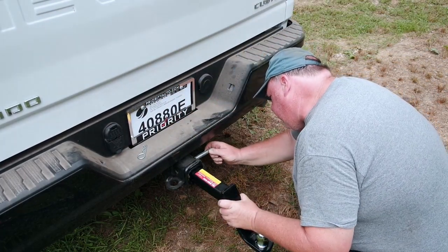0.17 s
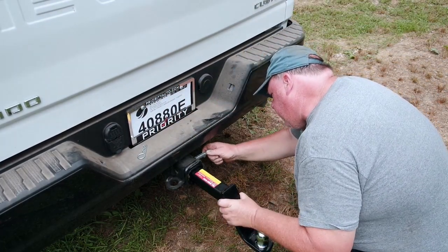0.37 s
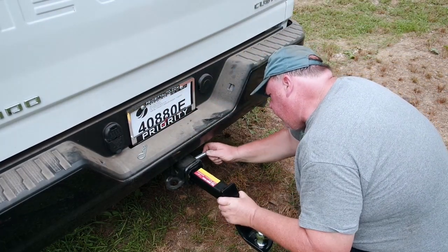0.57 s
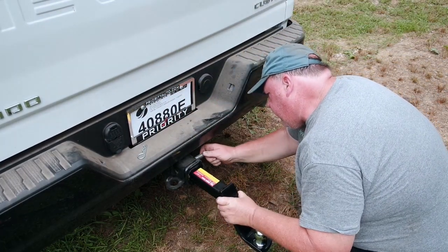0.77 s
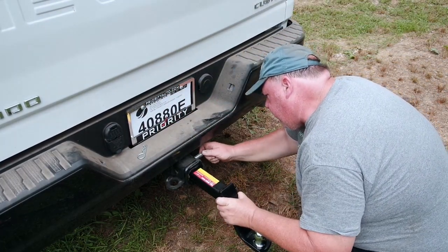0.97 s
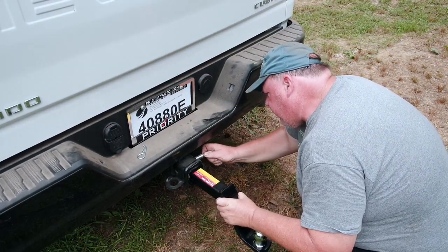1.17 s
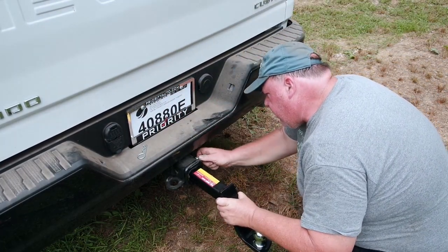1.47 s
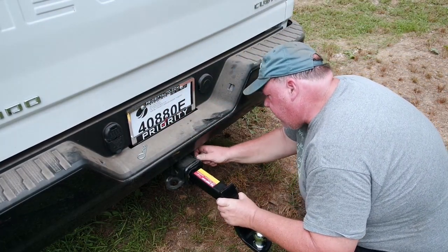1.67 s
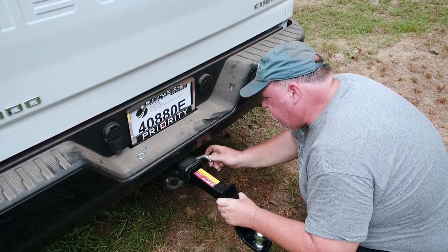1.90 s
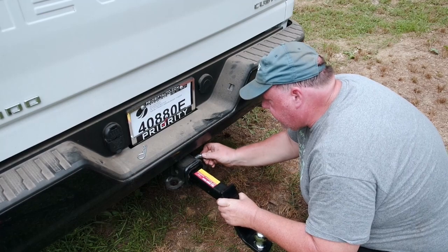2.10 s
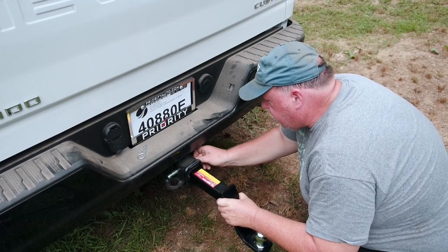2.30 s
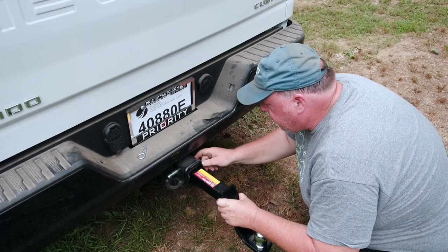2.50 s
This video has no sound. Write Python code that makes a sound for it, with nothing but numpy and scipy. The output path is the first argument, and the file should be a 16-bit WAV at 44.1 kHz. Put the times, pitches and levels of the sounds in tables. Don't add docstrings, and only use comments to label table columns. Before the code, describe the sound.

Metal clanking of a hitch close up outdoors: bright pin taps, a heavy shank knocking and scraping in its tube with hollow low thuds, then a short rattle and a loud, sharp click over quiet air.

```python
import sys
import numpy as np
from scipy import signal
from scipy.fft import rfft, irfft
from scipy.io import wavfile
from scipy.ndimage import uniform_filter1d

SR = 44100
rng = np.random.default_rng(int(sys.argv[2]) if len(sys.argv) > 2 else 0)


def ratio(d):
    e = np.asarray(d, float) / 20
    return 10 ** e


def wrap_up_sound(samples):
    columns = np.atleast_2d(samples).T
    tamed = np.clip(columns, -1, 1)
    steps = np.round(tamed * 32767).astype(np.int16)
    wavfile.write(sys.argv[1], SR, steps)


N = 116865
RING_N = 16000
CHATTER_N = 4000
OPEN_S = .099
BRIGHT_SPLIT_HZ, DULL_SPLIT_HZ = 5750, 2320
CLATTER_DB, CLEAR_DB = 5, -8
BOUNCE_S, GRIPPED_T60_S = 0.0024, 0.2

# hz, level_db, t60_s
PIN_MODES = [(2225, 1, 0.079), (2914, -10.5, 0.087), (5300, -13.5, 0.051), (6376, -5.5, 0.026),
             (7120, -2, 0.015), (8890, -10, 0.045), (10104, -4, 0.0043), (14300, -23, .045)]
# hz, level_db, t60_s
SHANK_MODES = [(1026, -28.5, .09), (1583, -27.5, 0.033), (2136, -4.5, 0.0067), (2670, -23, 0.023),
               (3116, -6.5, 0.026), (3774, -15, 0.034), (4210, -8, 0.033), (4580, -16, 0.014)]
# hz, level_db, t60_s
TUBE_MODE = (1874, -3, .075)
# hz, level_db, t60_s
BOOM_MODES = [(80, -15.5, 0.16), (112.4, -7, 0.21), (138.2, 7, 0.12), (189.3, -4.5, 0.25),
              (228.9, -15, 0.39), (266.6, -7.5, 0.098)]
# hz, level_db, t60_s
KNOCK_MODES = [(323, -8.5, 0.45), (384.6, -4, 0.24), (446.3, -2, 0.21), (504, 6.5, 0.059), (571, -3, 0.24),
               (619, -4, 0.12), (697.6, -1, 0.19), (788, -11.5, 0.11), (981.6, -4, 0.15)]


def evened(x):
    return x / np.sqrt(np.mean(x ** 2) + 1e-20)


def peaked(x):
    return x / (abs(x).max() + 1e-12)


def filtered(x, order, cut_hz, kind):
    return signal.sosfilt(signal.butter(order, cut_hz, kind, fs=SR, output="sos"), x)


def read(points, hz):
    f, value = np.transpose(points)
    return np.interp(np.log(hz + 1), np.log(f + 1), value)


def add(mix, start_s, sound):
    part = mix[round(start_s * SR):][:len(sound)]
    part += sound[:len(part)]


def yard():
    # hz, level_db_per_hz
    air_spectrum = [(15, -30), (25, -10), (160, -7.5), (368, -8.5), (469, -5.5), (1410, -11), (2360, -8.5),
                    (13900, -22), (15500, 0)]
    air_db, shut_db = -60.5, -13.5
    insect_hz, insect_width_hz, insect_db = 8500, 220, -81.5
    hz = np.fft.rfftfreq(N, 1 / SR)
    shape = ratio(read(air_spectrum, hz)) * (hz < 15600)
    air = irfft(rfft(rng.standard_normal(N)) * shape, N)
    above_2k = irfft(rfft(air) * (hz > 2000), N)
    band = 1 / (1 + ((hz - insect_hz) / insect_width_hz) ** 4)
    insect = evened(irfft(rfft(rng.standard_normal(N)) * band, N))
    shut = np.where(np.arange(N) < OPEN_S * SR, ratio(shut_db), 1)
    return shut * ratio(air_db) * air / above_2k.std() + ratio(insect_db) * insect


def ring(modes, chance, spread_db=0., size=RING_N):
    hz, db, t60_s = np.transpose(modes)[:, :, None]
    t = np.arange(size) / SR
    level_db = db + spread_db * chance[:len(modes), None] - 60 * t / np.maximum(t60_s, .01)
    return (ratio(level_db) * np.sin(2 * np.pi * hz * t)).sum(0)


def clatter(noise):
    # hz, level_db_per_hz
    spectrum = [(300, -18), (884, -10), (1910, -3.5), (4620, -13), (6000, -18.5), (15000, -28)]
    # hz, t60_s
    decay = [(300, 0.56), (1000, 0.19), (3000, 0.097), (8000, 0.079), (15000, 0.015)]
    hz, t, z = signal.stft(noise, SR, nperseg=128)
    z = z * ratio(read(spectrum, hz)[:, None] - 60 * t / read(decay, hz)[:, None])
    return signal.istft(z, SR, nperseg=128)[1][:len(noise)]


def chatter(length_s, chance):
    u = np.arange(len(chance)) / (SR * max(length_s, 1e-4))
    return chance ** 3 * (u + 0.29) * np.exp(-2 * u)


def contact(blow, modes, chatter_s, clatter_db, split_hz, grip_t60_s, spread_db):
    level_db, treble_db, ring_hz, ring_db = blow
    treble_lift_db, crack_db, crack_t60_s = 10, -5.5, 0.039
    chance = rng.standard_normal(RING_N + CHATTER_N)
    t = np.arange(RING_N) / SR
    push = chatter(chatter_s, chance[RING_N:])
    energy = np.cumsum(push ** 2) / np.sum(push ** 2)
    build = np.interp(np.arange(RING_N), np.arange(CHATTER_N), np.sqrt(energy))

    crack = np.diff(chance[:RING_N + 1]) * ratio(crack_db - 60 * t / crack_t60_s) / 4
    rough = signal.fftconvolve(peaked(clatter(chance[:RING_N])) + crack, push)[:RING_N]
    rough = peaked(rough * ratio(-60 * t / grip_t60_s))
    body = peaked(build * ring(modes + [TUBE_MODE], chance, spread_db)) + ratio(clatter_db) * rough

    treble = ratio(treble_db + treble_lift_db) * filtered(body, 3, split_hz, "high")
    body = filtered(body, 3, split_hz, "low") + treble
    ring_t60_s = 0.085 * TUBE_MODE[0] / ring_hz
    favoured = ring([(ring_hz, ring_db, ring_t60_s)], chance)
    return ratio(level_db) * peaked(peaked(body) + build * favoured)


def contacts(rows, modes, chatter_s, clatter_db, split_hz, grip_t60_s=18.0, spread_db=6):
    out = np.zeros(N)
    for start_s, *blow in rows:
        add(out, start_s, contact(blow, modes, chatter_s, clatter_db, split_hz, grip_t60_s, spread_db))
    return out


def pin_taps():
    # start_s, level_db, treble_db, ring_hz, ring_db
    taps = [(.102, -11.5, -3.5, 3430, -3), (.154, -15.5, -4.5, 1872, -3), (.4735, -21, -10, 7250, -15),
            (.6124, -14.5, -11, 2620, -4), (.7415, -19.5, -28, 1605, -13), (1.1588, -18, -8, 2470, -13.5),
            (1.979, -15, -16, 1874, -9), (2.0144, -28, -13, 5220, -17)]
    return contacts(taps, PIN_MODES, 0.0022, CLATTER_DB, BRIGHT_SPLIT_HZ)


def scrape():
    # time_s, scrape_db, rumble_db
    slide = [(0.102, -51.5, -67), (.4, -60, -49.5), (0.472, -37, -44), (.53, -48, -26.5),
             (0.721, -43, -31.5), (.85, -59, -45), (1.15, -52, -39.5), (1.35, -49.5, -31.5),
             (1.48, -40.5, -39), (1.6, -66, -40.5), (1.77, -66, -41.5), (1.8, -49, -44), (1.95, -55, -46),
             (2.1, -43.5, -38), (2.219, -48, -41.5), (2.311, -34.5, -45.5), (2.339, -81, -49),
             (2.65, -74, -57.5)]
    grit_per_s, grit_spread_db = 740, 1.5
    hiss_db, hiss_share = -63.5, 0.52
    time_s, scrape_db, rumble_db = np.transpose(slide)
    t, even = np.arange(N) / SR, np.zeros(20)
    grit = ratio(grit_spread_db * np.minimum(rng.exponential(1, N), 4))
    grit = grit * (rng.random(N) < grit_per_s / SR) * rng.choice([-1., 1.], N)

    steel = peaked(ring(SHANK_MODES + [TUBE_MODE], even))
    steel = steel + ratio(24.0) * peaked(clatter(rng.standard_normal(RING_N)))
    steel = steel + ratio(32.5) * peaked(ring(KNOCK_MODES, even))
    out = np.zeros(N)
    for body, level_db in ((steel, scrape_db), (ring(BOOM_MODES, even), rumble_db)):
        scale = np.std(signal.fftconvolve(grit, body)[:N])
        pressed = grit * ratio(np.interp(t, time_s, level_db, left=-140))
        out += signal.fftconvolve(pressed, body)[:N] / scale

    hiss = np.diff(rng.standard_normal(N + 1)) * (t > OPEN_S)
    swing_db = np.interp(t, time_s, scrape_db) - np.mean(scrape_db)
    return out + hiss * ratio(hiss_db + hiss_share * swing_db)


def thuds():
    # start_s, boom_db, knock_db
    knocks = [(0.105, -36.5, -66), (0.158, -30.5, -30), (0.208, -31, -26.5), (0.454, -25.5, -26.5),
              (0.485, -5.5, -10.5), (.574, -52, -23.5), (0.609, -15.5, -27.5), (0.699, -22.5, -27),
              (0.76, -39, -40), (0.811, -34, -55), (.94, -61, -35.5), (1.023, -13.5, -18.5),
              (1.129, -46, -38), (1.194, -14.5, -17.5), (1.301, -14.5, -20.5), (1.334, -6, -11.5),
              (1.387, -19, -26.5), (1.455, -17, -17.5), (1.491, -6.5, -11), (1.613, -28, -39.5),
              (1.824, -44, -23), (1.986, -56, -22), (2.019, -17.5, -17.5), (2.12, -41, -19.5)]
    shove_s, lag_s, rise_s, build_s = 0.0041, 0.006, 0.0031, 0.021
    detune = 0.044
    swell = 1 - np.exp(-np.arange(RING_N) / SR / rise_s)
    shove = np.r_[np.zeros(round(lag_s * SR)), np.hanning(round(shove_s * SR))]
    crowded = KNOCK_MODES * 3
    out = np.zeros(N)
    for start_s, boom_db, knock_db in knocks:
        chance = rng.standard_normal(CHATTER_N)
        boom = (BOOM_MODES, boom_db, shove, swell)
        knock = (crowded, knock_db, chatter(build_s, chance), 1)
        for modes, level_db, push, rise in (boom, knock):
            moved = [(hz * (1 + detune * c), db, t60_s) for (hz, db, t60_s), c in zip(modes, chance[::-1])]
            sound = signal.fftconvolve(rise * ring(moved, chance, 2.0), push)
            add(out, start_s, ratio(level_db) * peaked(sound))
    return out


def rim_taps():
    # start_s, level_db, treble_db, ring_hz, ring_db
    taps = [(.2016, -8.5, -12.5, 5360, -3), (.4044, -31.5, -11, 2170, -16.5), (.439, -27.5, -22.5, 2100, 7),
            (.46, -19.5, -41, 2156, 1), (.5889, -24.5, -2, 1916, 8), (.6791, -32.5, -25, 3400, -18)]
    # hz, level_db, t60_s
    rim_modes = [(1220, -34, 0.05), (1687, -13, 0.096), (2330, 0.5, 0.071), (2630, -17, 0.12),
                 (2900, -15, 0.13), (3530, -35, 0.13), (5704, -20, 0.2), (6600, -28.5, 0.16)]
    return contacts(taps, rim_modes, 0.0022, CLATTER_DB, BRIGHT_SPLIT_HZ)


def pin_skids():
    # start_s, level_db, treble_db, ring_hz, ring_db
    skids = [
        (.475, -10.5, 22, 7250, -5.5),
        (2.102, -35, -26, 2520, -5.5),
        (2.109, -18.5, -19, 3005, 4),
        (2.3145, -15.5, -6, 2814, -2.5),
    ]
    return contacts(skids, PIN_MODES, 0.009, CLATTER_DB, BRIGHT_SPLIT_HZ)


def shank_grinds():
    # start_s, level_db, treble_db, ring_hz, ring_db
    grinds = [
        (.478, -10.5, -41, 1523, -2),
        (1.331, -22.5, -6.5, 1900, 4),
        (1.457, -23, -17, 3970, -14),
        (1.487, -14, -25, 1970, -11),
    ]
    return contacts(grinds, SHANK_MODES, 0.014, CLATTER_DB, DULL_SPLIT_HZ)


def shank_hits():
    # start_s, level_db, treble_db, ring_hz, ring_db
    hits = [(.5635, -10.5, -35, 1873, 3), (.6992, -29, -29, 1880, 2), (.9277, -23.5, -17, 1934, 0),
            (1.019, -20, -16, 4210, 2), (1.1194, -46.5, -12, 1880, 16), (1.1915, -22.5, -13.5, 4210, 0),
            (1.298, -16.5, -11.5, 1873, 2), (1.820, -23, -37, 2407, -7.5), (2.074, -31, -29, 1900, -17),
            (2.2368, -23.5, -21, 3850, -15.5)]
    return contacts(hits, SHANK_MODES, 0.0054, CLATTER_DB, DULL_SPLIT_HZ)


def shank_bounces():
    # start_s, level_db, treble_db, ring_hz, ring_db
    bounces = [(1.0255, -21.5, -26, 4210, 6.5), (1.2948, -23, -19.5, 4226, 1),
               (1.4925, -5.5, -35, 1575, -12), (1.497, -6, -22, 3190, -10), (1.834, -33, -28, 2380, 5),
               (2.249, -32.5, -23, 1894, 3), (2.286, -27, -25, 3120, -7), (.629, -24.5, -14, 2620, 9)]
    return contacts(bounces, SHANK_MODES, BOUNCE_S, -1, DULL_SPLIT_HZ, GRIPPED_T60_S)


def frame_thumps():
    # start_s, level_db, treble_db, ring_hz, ring_db
    thumps = [
        (1.194, -18, -23, 1874, -19),
        (1.3365, -15.5, -21, 1927, -19),
        (1.344, -15.5, -19, 1867, -21),
        (1.827, -32.5, -22, 1910, -15),
    ]
    # hz, level_db, t60_s
    thump_modes = [(325, -7, 0.051), (484, 6.5, 0.068), (553, 0, 0.056), (713, -3.5, 0.049)]
    return contacts(thumps, thump_modes, BOUNCE_S, CLEAR_DB, DULL_SPLIT_HZ, GRIPPED_T60_S, 0.83)


def pin_rattles():
    # start_s, level_db, treble_db, ring_hz, ring_db
    rattles = [
        (2.1175, -13.5, -16, 5330, -2.5),
        (2.138, -34, -10, 2360, -4),
    ]
    # hz, level_db, t60_s
    loose_modes = [(1012, -8, .15), (1534, -2, .06), (2148, -5, .08), (2315, -8, .08), (2541, -8, .08),
                   (3031, -6, .08), (3677, -6, .08), (4204, -9, .08), (5335, -9, .06), (7730, -17, .11),
                   (8344, -25, .2), (8990, -15, .09), (11300, -16, .11)]
    return contacts(rattles, loose_modes, .012, CLEAR_DB, BRIGHT_SPLIT_HZ, spread_db=2.5)


def seat_click():
    # start_s, level_db, treble_db, ring_hz, ring_db
    clicks = [
        (2.3162, 0., -11.5, 6506, -4.8),
    ]
    # hz, level_db, t60_s
    seat_modes = [(1529, -20, .12), (2568, -13, .11), (2800, 5, .018), (3219, -11, .07), (3844, -15, .12),
                  (4086, -16, .13), (4398, -15, .1), (5039, -20, .09), (5938, -18, .085), (6551, -19, .09),
                  (7590, -23, .1), (8834, -22, .1), (10500, -23, .09), (11000, -29, .1)]
    click = contacts(clicks, seat_modes, 0.0015, 4, BRIGHT_SPLIT_HZ, grip_t60_s=0.02, spread_db=0.83)
    return filtered(click, 2, 1660, "high")


def scene():
    steel = pin_taps() + thuds() + rim_taps() + shank_grinds() + shank_hits() + pin_rattles()
    mix = yard() + scrape() + filtered(steel, 3, 159.7, "high")
    mix = mix + pin_skids() + shank_bounces() + frame_thumps() + seat_click()
    return mix[None]


def ducked(x):
    duck_from_db, duck_share, recover_db_per_s = -19, 0.12, 5
    power = uniform_filter1d(x[0] ** 2, size=1500, origin=749)
    power_db = 10 * np.log10(abs(power) + 1e-12)
    fall_db = np.arange(N) * recover_db_per_s / SR
    held_db = np.maximum.accumulate(power_db + fall_db) - fall_db
    over_db = np.maximum(held_db - duck_from_db, 0)
    return x / ratio(duck_share * uniform_filter1d(over_db, size=600, origin=299))


def treble_dropouts(x):
    # centre_s, length_s, above_hz
    dropouts = [
        (1.043, .026, 5300),
        (1.107, .022, 4600),
        (1.768, .022, 4500),
        (1.832, .02, 4600),
    ]
    t, out = np.arange(N) / SR, x
    for centre_s, length_s, above_hz in dropouts:
        highpass = signal.butter(6, above_hz, "high", fs=SR, output="sos")
        gate = np.clip(2 - 4 * abs(t - centre_s) / length_s, 0, 1)
        out = out - signal.sosfiltfilt(highpass, x) * gate
    return out


def top_cut(x):
    return signal.sosfilt(signal.butter(12, 15870, fs=SR, output="sos"), x)


def record(dry):
    x = ducked(dry)
    x = signal.sosfilt(signal.cheby2(12, 34, 15100, fs=SR, output="sos"), x)
    x = filtered(x, 2, 62, "high")
    return top_cut(np.clip(treble_dropouts(x), -1, 1))


dry = scene()
out = record(dry)
wrap_up_sound(out)
```